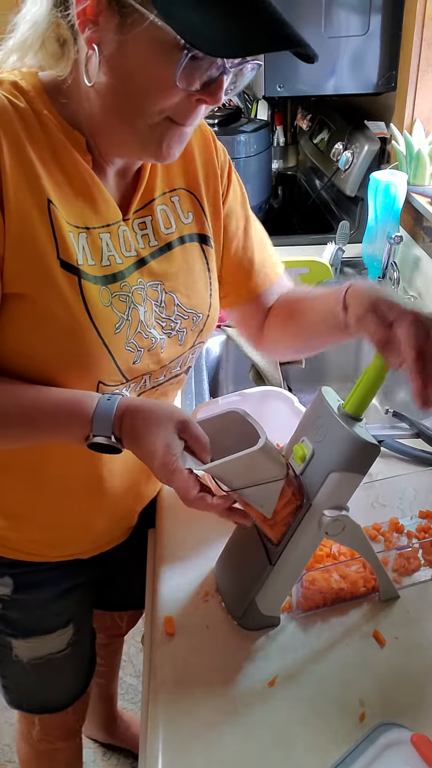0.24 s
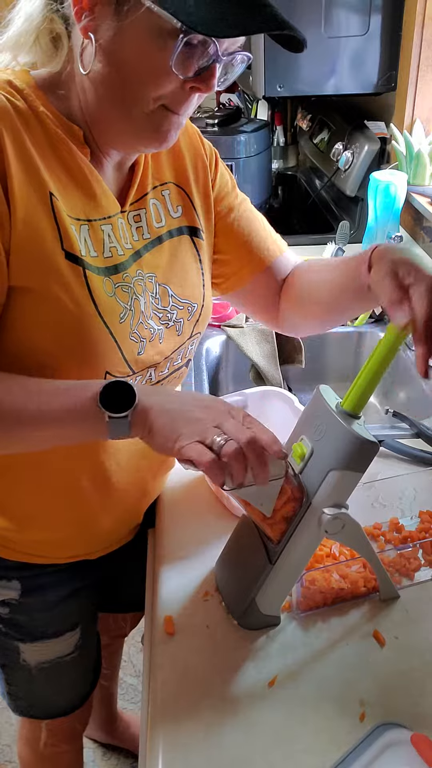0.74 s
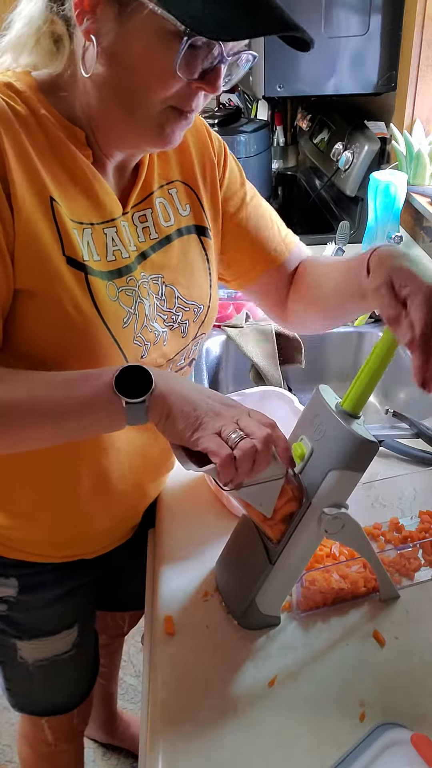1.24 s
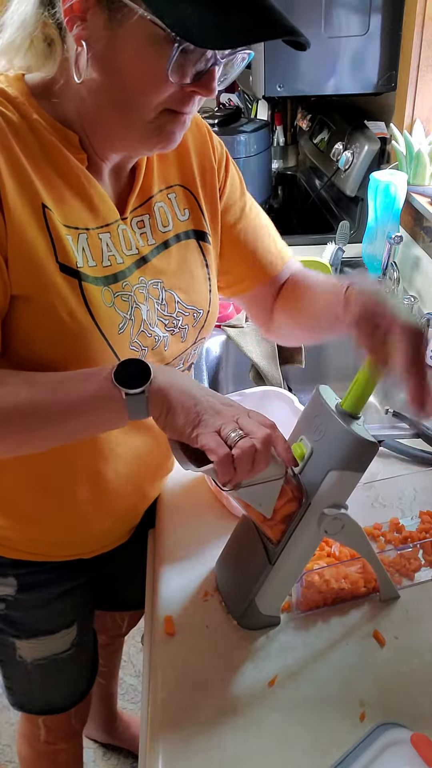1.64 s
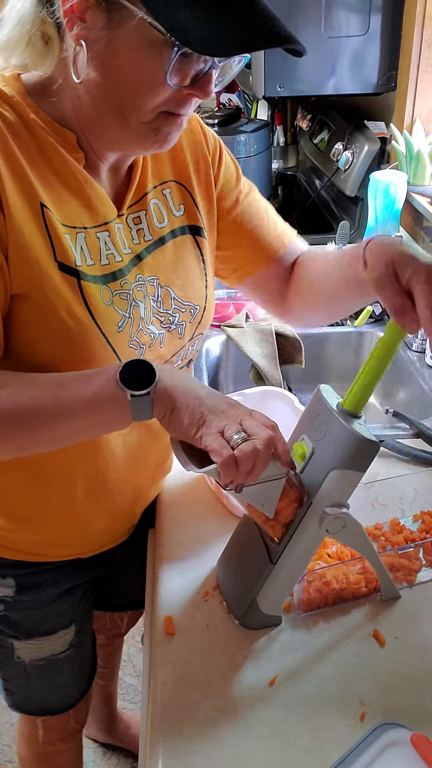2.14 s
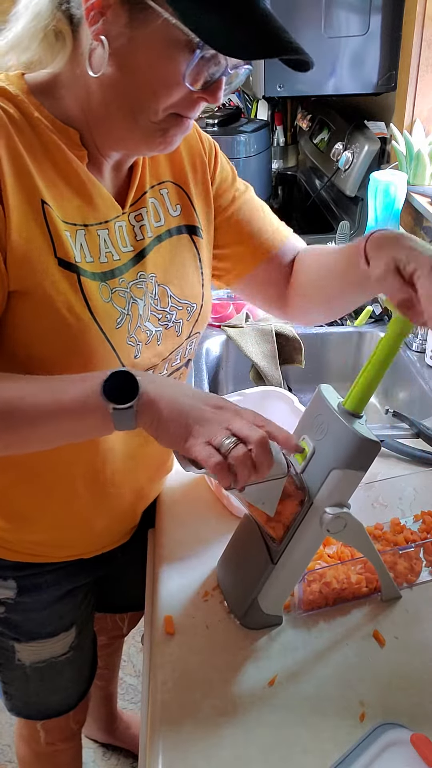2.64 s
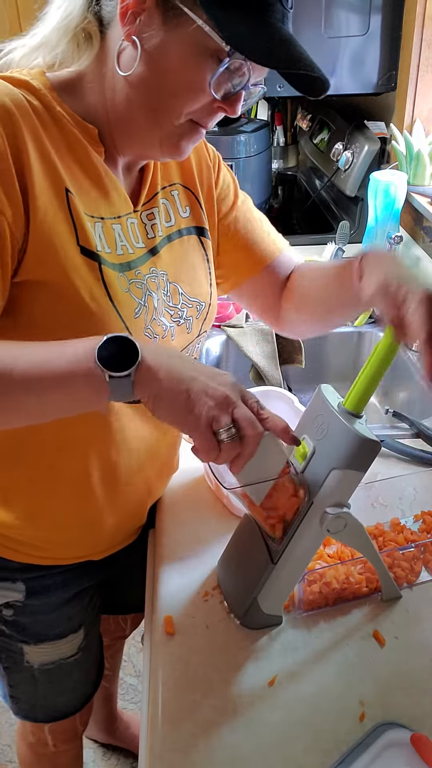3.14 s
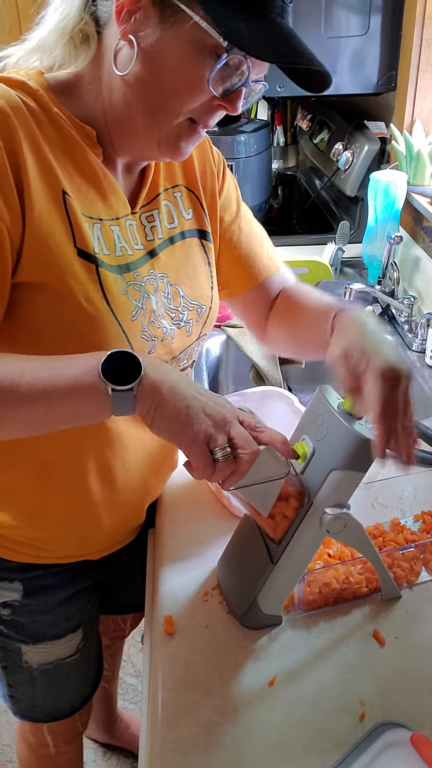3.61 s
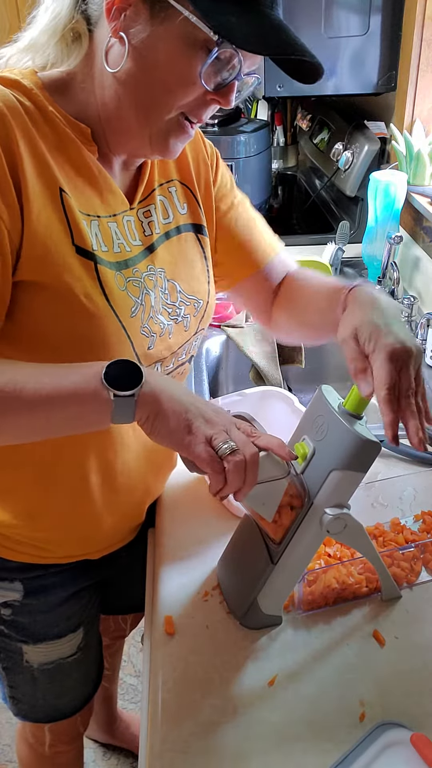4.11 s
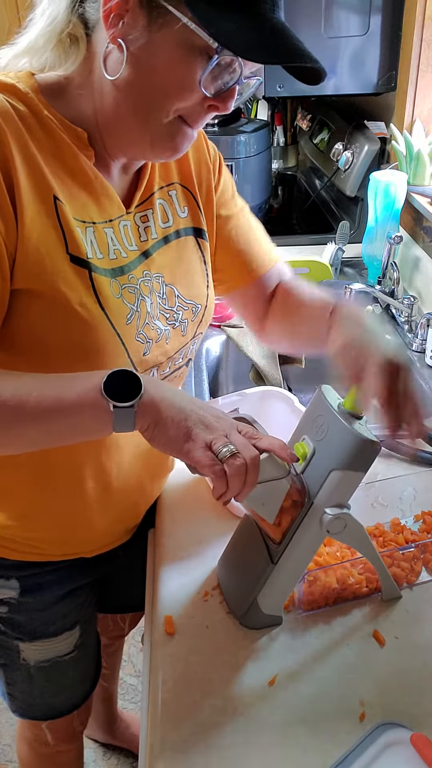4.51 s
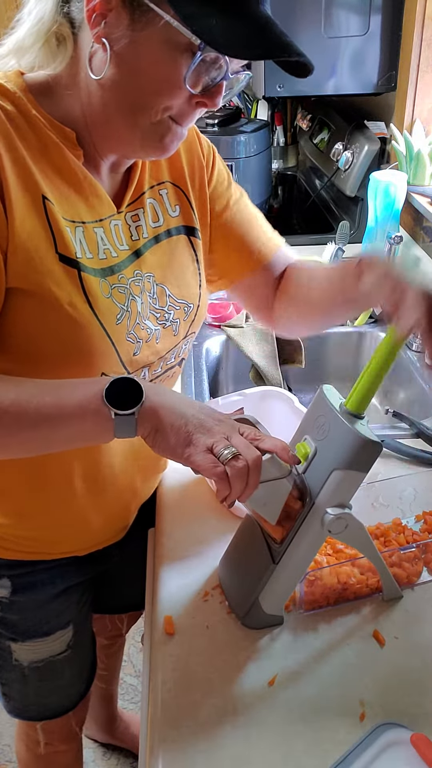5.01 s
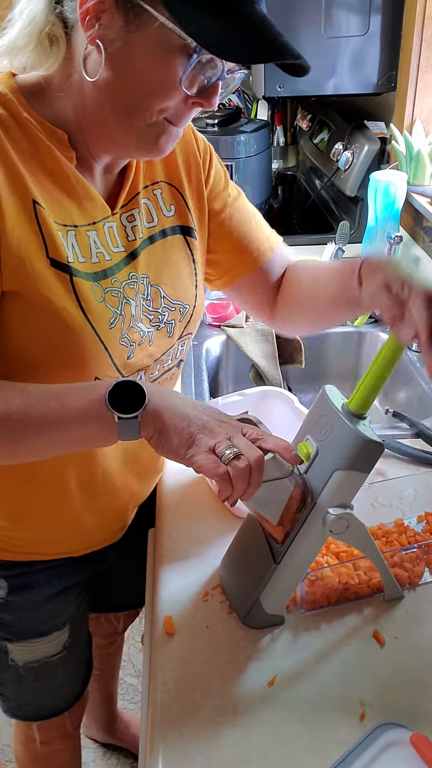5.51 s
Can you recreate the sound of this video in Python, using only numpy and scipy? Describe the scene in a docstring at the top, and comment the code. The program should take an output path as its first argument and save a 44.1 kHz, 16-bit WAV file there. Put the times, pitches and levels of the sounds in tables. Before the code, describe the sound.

A plastic push-handle slicer chops carrots close to the microphone in a small, quiet kitchen with a short echo. Each push gives a brief, grainy rasp of blade through carrot, and each spring return ends in a sharp, hollow plastic clack with a slight rattle. The first clacks come at about 0.1 and 0.7 seconds, followed by a few soft, thumping bites into firm carrot. The handle hits bottom with a dull knock and a low thud through the counter at about 1.4, 1.9, 3.5, 4.4, 4.8 and 5.2 seconds. Return clacks fall around 1.7, 2.1, 2.6, 3.2, 3.7, 4.6, 5.0 and 5.5 seconds, so the last strokes form a quicker thud-and-clack pattern. Throughout, carrot pieces tick and knock lightly in the hollow feed chute, and the sliding parts rub softly. One more faint rasp follows near 5.7 seconds.

```python
"""Sharp plastic clacks, hollow thuds and short rasps: a push-handle slicer chops carrots close by.
Each push rasps the blade through the carrot and may thud on the bottom stop; a spring slides the
carriage back up until it clacks on the top stop. Pieces knock in the feed chute. Blows on the
stops shake the counter and the catch tray, and a small kitchen reverberates."""
import sys
import numpy as np
from scipy import signal
from scipy.fft import rfft, irfft, next_fast_len
from scipy.io import wavfile
from scipy.ndimage import uniform_filter1d, map_coordinates

SR = 44100
rng = np.random.default_rng(int(sys.argv[2]) if len(sys.argv) > 2 else 0)


def generate_wav(signal):
    """Clip the signal to [-1, 1] and save it as 16-bit WAV at the path in sys.argv[1]."""
    frames = np.transpose(np.atleast_2d(signal))
    scaled = np.clip(frames, -1, 1) * 32767
    pcm = np.round(scaled).astype(np.int16)
    wavfile.write(sys.argv[1], SR, pcm)


N = 254016
AGE_S = np.arange(SR // 3) / SR  # time since a blow
BASS_WET_DB = -14

# Table levels are relative; each layer adds its own offset.
# carriage hits the top stop: (time [s], clack [dB], panel ring [dB], panel pitch [Hz],
# chute walls [dB], treble [dB], thump [dB], rubbing on the way up [dB])
RETURNS = [(0.1183, -5, -4, 728, -7, -11.5, -18, -35.5), (0.7301, -13.5, -5, 956, -6, -13, -23.5, -48),
           (1.6764, -4.5, -7.5, 640, -25.5, -12, -25, -40),
           (2.1358, -1.5, -1.5, 655, -16.5, -17, -19.5, -40.5),
           (2.614, -2.5, -9, 534, -17.5, -16, -26, -44), (3.1704, -5, -17, 694, -12.5, -16.5, -22.5, -46.5),
           (3.7321, -5, -4, 1145, -6, -13, -19, -38.5), (4.6064, -4.5, 1, 671, -28, -14, -18, -37.5),
           (5.029, -5, -4.5, 657, -16, -15.5, -19.5, -40.5), (5.4693, -8.5, 4.5, 658, -9.5, -15, -19, -40)]
# handle hits the bottom stop: (time [s], clack [dB], treble [dB], thump [dB])
PUSHES = [(1.3908, -6, -20, -14.5), (1.878, -6.5, -21, -17.5), (3.4737, -11, -25.5, -17.5),
          (4.3665, -7, -20.5, -15.5), (4.7894, -6.5, -20.5, -16), (5.2398, -8.5, -22, -17)]
# blade bites firm carrot: (time [s], thump [dB])
BITES = [(0.871, -32.5), (1.197, -33), (1.323, -21), (1.828, -25), (3.401, -25.5)]
# feed chute wall spectrum: (frequency [Hz], level [dB])
CHUTE_WALLS = [(500, -28), (1000, -16), (1240, -1), (1400, -12.5), (1560, 3), (1750, -10.5), (2100, -18),
               (3500, -31.5), (16000, -54.5)]
# left-right correlation: (frequency [Hz], correlation [-1..1])
CORRELATION = [(60, 0.97), (130, 1), (290, 0.74), (640, 0.7), (1400, 0), (3000, 0.12), (15000, 0)]


def amp(db):
    """Decibels to gain."""
    return 10 ** (np.asarray(db) / 20)


def pan(right_db):
    """Stereo gains for a right-minus-left level."""
    return amp(right_db * np.array([[-.5], [.5]]))


def unit(x):
    """Scale to rms 1."""
    return x / np.sqrt(np.mean(x ** 2) + 1e-20)


def along(points, hz):
    """Read (frequency [Hz], value) points on a log axis."""
    knots_hz, values = np.transpose(points)
    return np.interp(np.log(hz + 1), np.log(knots_hz + 1), values)


def fade(t, t60_s):
    """Free decay, 60 dB in t60_s."""
    return np.exp(-np.log(1000) * t / t60_s)


def wobble(knots_per_s):
    """Smooth random curve."""
    return map_coordinates(rng.standard_normal(N // 8), [np.arange(N) * knots_per_s / SR], mode="wrap")


def filtered(x, response):
    """Zero-phase filter with gain response(hz)."""
    size = x.shape[-1]
    padded = next_fast_len(size + 8192)
    return irfft(rfft(x, padded) * response(np.fft.rfftfreq(padded, 1 / SR)), padded)[..., :size]


def stereo_angle(hz):
    """Mid-side angle [rad] for the left-right correlation."""
    return np.arccos(np.clip(along(CORRELATION, hz), -1, 1)) / 2


def noise(spectrum, size=N):
    """Coloured stereo noise, rms 1: bass alike in both ears, treble unrelated."""
    colour = lambda hz: amp(along(spectrum, hz)) * [np.cos(stereo_angle(hz)), np.sin(stereo_angle(hz))]
    mid, side = filtered(rng.standard_normal((2, size)), colour)
    return unit(np.array([mid + side, mid - side]))


def add(track, at_s, sound):
    """Mix a sound into the track."""
    start = max(round(at_s * SR), 0)
    part = sound[:, :N - start]
    track[:, start:start + part.shape[1]] += part


def ring(modes, attack_s, scatter_db):
    """Struck modes (frequency [Hz], level [dB], t60 [s]); strength and phase vary per blow."""
    hz, db, t60_s = np.transpose(modes)[:, :, None]
    strength, phase, skew = rng.standard_normal((3, len(modes), 1))
    apart = np.sign(skew) * stereo_angle(hz)
    envelope = amp(db + scatter_db * strength) * fade(AGE_S, t60_s) * (1 - np.exp(-AGE_S / attack_s))
    angle = 2 * np.pi * (hz * AGE_S + phase)
    return np.array([np.sum(envelope * np.sin(angle + ear * apart), 0) for ear in (1, -1)])


def note(hz, t60_s):
    """One dominant resonance."""
    return ring([(hz, 0, t60_s)], attack_s=.0015, scatter_db=0)


def chatter(spectrum, treble_db, spread_s, t60_s, count):
    """Loose plastic parts meet in a few dry cracks."""
    jitter = rng.uniform(0, 0.34, count) * (np.arange(count) > 0)
    delays_s = spread_s * (np.arange(count) + jitter) / count
    age_s = AGE_S - delays_s[:, None]
    power = np.sum((age_s > 0) * fade(np.abs(age_s), t60_s) ** 2, 0)
    envelope = np.sqrt(np.abs(uniform_filter1d(power, size=40)))
    shelf = lambda hz: amp(treble_db * along([(1500, 0.048), (6000, 1)], hz))
    return filtered(noise(spectrum, size=len(AGE_S)), shelf) * envelope


def air():
    """Faint, low room noise."""
    # (frequency [Hz], level [dB])
    spectrum = [(30, -9.5), (90, -7), (180, -16), (900, -26), (2500, -51.5), (16000, -73)]
    return amp(-54) * noise(spectrum)


def in_kitchen(x, wet_db):
    """Direct sound plus a room tail; each frequency dies at its own rate."""
    # reverberation time: (frequency [Hz], t60 [s])
    decay = [(70, 0.31), (250, 0.64), (700, 0.3261), (2500, 0.42), (7000, 0.18), (15000, 0.61)]
    # tail colour: (frequency [Hz], level [dB])
    colour = [(60, -1), (130, -3), (280, 3), (700, 2), (2500, -5.5), (7000, 0.5), (15000, -16.5)]
    white = noise([(20, 0), (20000, 0)], size=SR // 2)
    hz, t, bins = signal.stft(white, SR, nperseg=256)
    tail = signal.istft(bins * fade(t, along(decay, hz)[:, None]), SR, nperseg=256)[1]
    build_up = 1 - np.exp(-(np.arange(tail.shape[1]) / SR / 0.0054) ** 2)
    tail = filtered(tail / np.linalg.norm(tail[0]), lambda f: amp(along(colour, f))) * build_up
    wet = amp(wet_db) * signal.fftconvolve(x, tail, axes=1)
    return wet + np.pad(x, ((0, 0), (0, wet.shape[1] - x.shape[1])))


def thump(contact_s):
    """A blow drives the counter's low modes (longer contact is duller); room bass hangs on."""
    # slicer on the counter: (frequency [Hz], level [dB], t60 [s])
    counter_modes = [(63.5, -9, 0.13), (87.9, -0.5, 0.15), (170.7, -2, 0.044), (261, -17.5, 0.13)]
    # kitchen standing waves: (frequency [Hz], level [dB], t60 [s])
    room_modes = [(54.4, 4, 0.76), (77.8, -6, 0.76)]
    response = sum(-(-1) ** k * amp(db) * fade(AGE_S, t60_s) * np.sin(2 * np.pi * hz * AGE_S)
                   for k, (hz, db, t60_s) in enumerate(counter_modes))
    force = np.sin(np.pi * np.minimum(AGE_S / contact_s, 1)) ** 2
    shake = signal.fftconvolve(response, force / force.sum())[:len(AGE_S)]
    # upper modes radiate from the right
    placement = lambda hz: pan(along([(80, 1.3), (150, 6.5), (300, 2.4)], hz))
    room_bass = amp(-22) * ring(room_modes, attack_s=0.055, scatter_db=4)
    return filtered(shake, placement) + room_bass


def stand(rubbing):
    """Stand and counter rumble behind the carriage's motion and jolt where the blade bites."""
    # rumble: (frequency [Hz], level [dB])
    spectrum = [(25, -38), (38, -12), (48, -7), (62, -6.5), (82, -0.5), (105, -12.5), (135, -14.5),
                (400, -60)]
    rest_db, rock_db, lag_s = -52, -1.5, 0.018
    pole = np.exp(-1 / (lag_s * SR))
    rocking = signal.lfilter([1 - pole], [1, -pole], rubbing)
    out = (amp(rest_db) + amp(rock_db) * rocking) * noise(spectrum)
    for at_s, db in BITES:
        add(out, at_s, amp(db + 11) * thump(contact_s=0.0082))
    return out


def swell(peak_s, rise_s, t60_s):
    """A movement eases in to its peak, then dies away."""
    t = np.arange(N) / SR - peak_s
    ahead = np.clip(-3.06 * t / rise_s, 0, 20)
    return fade(np.maximum(t, 0), t60_s) / np.cosh(ahead)


def travel():
    """Rubbing and rasp envelopes: all carriage movements, summed in power."""
    # hand cuts or nudges the carrot: (peak time [s], rise [s], rubbing [dB], rasp offset [dB])
    strokes = [(0.245, 0.082, -43, -0.5), (0.34, .08, -54.5, -4.5), (0.52, 0.17, -43, -12.5),
               (0.878, 0.06, -40.5, -5.5), (1.219, 0.087, -44, -13.5), (1.387, 0.084, -28, -4.5),
               (1.87, 0.2, -33, -6), (2.352, .095, -32, -7), (2.896, 0.15, -36, -12),
               (3.336, 0.061, -39.5, -11.5), (3.462, 0.12, -33, -7), (3.6, .06, -51, -7.5),
               (3.94, 0.097, -34.5, -8), (4.218, 0.088, -41.5, -10.5), (4.363, 0.068, -27.5, -7.5),
               (4.785, 0.15, -30.5, -9), (5.23, 0.19, -31.5, -8), (5.657, 0.15, -35, -5.5)]
    spring_s, spring_attack_s = 0.092, 0.014
    spring_rasp_db, shiver_rasp_db, bite_rasp_db = -8, -16.5, -3
    moves = [(amp(db) * swell(at_s, rise_s, t60_s=0.17), rasp_db)
             for at_s, rise_s, db, rasp_db in strokes]
    t = np.arange(N) / SR
    for at_s, *_, db in RETURNS:
        speed = .5 * (1 + np.tanh((t - at_s + spring_s) / (2 * spring_attack_s))) * (t < at_s)
        moves.append((amp(db) * speed, spring_rasp_db))
    for at_s, db, *_ in RETURNS + PUSHES:
        shiver = amp(db - 23.5) * swell(at_s + 0.012, rise_s=0.026, t60_s=0.33)
        moves.append((shiver, shiver_rasp_db))
    for at_s, db in BITES:
        crunch = amp(db - 14) * swell(at_s + 0.0056, rise_s=0.0056, t60_s=0.13)
        moves.append((crunch, bite_rasp_db))
    rubbing = np.sqrt(sum(move ** 2 for move, _ in moves))
    rasping = np.sqrt(sum((amp(rasp_db) * move) ** 2 for move, rasp_db in moves))
    return rubbing, rasping


def sliding(rubbing, rasping):
    """The carriage rubs its rails while the blade bursts carrot cells in uneven grains."""
    # rail friction: (frequency [Hz], level [dB])
    rub_spectrum = [(80, -7.5), (200, 1.5), (400, -5.5), (580, -3), (680, 5), (800, 0), (1300, -3.5),
                    (2400, -8), (4000, -12.5), (7000, -21.5), (16000, -46)]
    # blade in carrot: (frequency [Hz], level [dB])
    rasp_spectrum = [(500, -39), (2000, 6.5), (4000, -2.5), (7000, -6), (9000, -3), (12500, -5),
                     (16000, -8)]
    slips = wobble(knots_per_s=130)
    grains = wobble(knots_per_s=1700)
    rub = amp(-0.5) * rubbing * unit(amp(2 * slips + 0.52 * grains) * noise(rub_spectrum))
    rasp = amp(4.5) * rasping * unit(amp(2.2 * slips + 1.7 * grains) * noise(rasp_spectrum))
    return in_kitchen(rub + rasp, wet_db=-11)[:, :N] * pan(right_db=1.4)


def crumbs(rubbing):
    """Knock rows for loose dice tumbling at random, harder while the carriage moves."""
    rate_per_s, rest_db, moving_db, scatter_db = 22, -55.5, 1, 7
    ring_db, centre_hz, span_octaves, treble_db = -3.5, 775, .6, -23
    rows = []
    for when, size, pitch in rng.uniform(size=(round(rate_per_s * N / SR), 3)):
        at = int(when * N)
        db = 20 * np.log10(amp(rest_db) + amp(moving_db) * rubbing[at]) + scatter_db * (2 * size - 1)
        ring_hz = centre_hz * 2 ** (span_octaves * (pitch - .5))
        rows.append((at / SR, db, ring_db, ring_hz, treble_db))
    return rows


def chute(rubbing):
    """Carrot pieces and the pusher knock in the hollow feed chute; its note shifts with the load."""
    # (time [s], knock [dB], ring [dB], ring pitch [Hz], treble [dB])
    knocks = [(0.0044, -18.5, -1.5, 930, -22.5), (0.364, -26.5, -7.5, 954, -11),
              (0.379, -18.5, -13.5, 696, -11.5), (0.4304, -34, 11, 690, -38), (0.6828, -26, -6.5, 692, -16),
              (1.1558, -35, -3.5, 640, -24), (1.1988, -29, 0, 905, -18.5), (1.3147, -22.5, -10.5, 710, -16),
              (1.5744, -23.5, 2.5, 673, -28), (1.9624, -25.5, -13, 702, -3.5),
              (2.3984, -25.5, -2, 684, -15), (2.945, -34.5, 4, 704, -22), (3.296, -23, -6, 897, -24.5),
              (4.3131, -25, 3.5, 690, -19), (4.9114, -24, 1.5, 670, -15), (5.1564, -19, 1.5, 679, -28),
              (5.1746, -3.5, -4, 696, -25)]
    # contact tick: (frequency [Hz], level [dB])
    spectrum = [(100, 1), (400, -2.5), (700, -4), (1500, -1), (2400, 0), (3500, -3), (7000, -19),
                (12000, -27.5), (16000, -30)]
    out = np.zeros((2, N))
    for at_s, db, ring_db, ring_hz, treble_db in knocks + crumbs(rubbing):
        tick = amp(db - 10.5) * chatter(spectrum, treble_db + 9, spread_s=.004, t60_s=0.039, count=2)
        walls_db = db - 0.5 * treble_db - 26  # dull knocks move the walls more
        walls = amp(walls_db) * chatter(CHUTE_WALLS, 0, spread_s=0.012, t60_s=0.092, count=2)
        hollow = amp(db + ring_db - 4) * note(ring_hz, t60_s=0.079)
        add(out, at_s, tick + walls + hollow)
    return in_kitchen(out, wet_db=-7)[:, :N]


def tray(attack_s, t60_s):
    """Hollow stand and catch tray boom; the shifting carrot heap retunes them at every blow."""
    # (frequency [Hz], level [dB])
    modes = [(168, 6), (228, 14), (258, -4), (288, -2), (318, 6), (348, -4.5), (385, -1.5), (437, -10.5),
             (512, -6.5)]
    hz, db = np.transpose(modes)
    load = 1 + .025 * rng.standard_normal(len(hz))
    return ring(np.column_stack([hz * load, db, np.full(len(hz), t60_s)]), attack_s, scatter_db=2.5)


def housing(attack_s):
    """The plastic shell rings: higher modes die sooner, all shift slightly with the grip."""
    # (frequency [Hz], level [dB])
    modes = [(525, -18), (660, -5), (810, -1.5), (938, -2), (1200, -0.5), (1670, 1.5), (2000, 2.5),
             (2300, 2), (2480, -14.5), (2840, 1), (3740, -12.5), (4240, -5), (5020, -8), (6375, -4)]
    hz, db = np.transpose(modes)
    grip = 1 + .008 * rng.standard_normal(len(hz))
    t60_s = .09 * np.sqrt(660 / hz)
    return ring(np.column_stack([hz * grip, db, t60_s]), attack_s, scatter_db=4.5)


def bottom_stop():
    """The hand drives the handle home: a dull knock and a hard thud that sets the tray booming."""
    # impact: (frequency [Hz], level [dB])
    spectrum = [(100, -5), (300, 1), (700, -0.5), (1400, -2), (2300, -1), (3300, -7), (7000, -15),
                (12000, -17), (16000, -33)]
    out = np.zeros((2, N))
    for at_s, db, treble_db, thump_db in PUSHES:
        crack = amp(db - 8.5) * chatter(spectrum, treble_db + 17, spread_s=0.0095, t60_s=0.037, count=3)
        body = amp(db - 19.5) * housing(attack_s=0.0012)
        panel = amp(db - 8.5) * note(hz=677.6, t60_s=0.067)
        handle = amp(db - 11) * note(hz=2345, t60_s=0.042)
        knock = (crack + body + panel + handle) * pan(right_db=2.5)
        add(out, at_s, in_kitchen(knock, wet_db=-5))
        thud = amp(thump_db + 12.5) * thump(contact_s=0.0025)
        add(out, at_s - .002, in_kitchen(thud, BASS_WET_DB))
        add(out, at_s, amp(thump_db - 13) * tray(attack_s=0.035, t60_s=0.23))
    return out


def top_stop():
    """The spring throws the carriage against its stop: a bright clack, then a settling rattle."""
    # impact: (frequency [Hz], level [dB])
    spectrum = [(100, 2.5), (300, -6), (700, 1), (1400, -2), (2800, 0.5), (4200, -8.5), (7000, -12.5),
                (12000, -14), (16000, -20.5)]
    out = np.zeros((2, N))
    for at_s, db, panel_db, panel_hz, walls_db, treble_db, thump_db, _ in RETURNS:
        crack = amp(db - 12) * chatter(spectrum, treble_db + 18, spread_s=.007, t60_s=0.031, count=4)
        rattle = amp(db - 19) * chatter(spectrum, treble_db + 12, spread_s=0.049, t60_s=0.065, count=6)
        rattle *= fade(AGE_S, t60_s=0.66)
        body = amp(db - 17) * housing(attack_s=0.001)
        walls = amp(db + walls_db - 9) * chatter(CHUTE_WALLS, 0, spread_s=0.0029, t60_s=0.09, count=3)
        # grip and load decide which panel rings most
        panel = amp(db + panel_db - 2.5) * note(panel_hz, t60_s=0.059)
        clack = (crack + rattle + body + walls + panel) * pan(right_db=2)
        add(out, at_s, in_kitchen(clack, wet_db=-7.5))
        # faint hollow lead-in just before each clack
        lead_in = amp(db - 28) * chatter(CHUTE_WALLS, 0, spread_s=0.0034, t60_s=0.025, count=2)
        add(out, at_s - .005, lead_in)
        recoil = amp(thump_db + 16.5) * thump(contact_s=0.0099)
        add(out, at_s + 0.0015, in_kitchen(recoil, BASS_WET_DB))
        add(out, at_s, amp(thump_db - 18) * tray(attack_s=0.0012, t60_s=0.14))  # damped by the hand
    return out


def scene():
    """The slicer over the kitchen's quiet air."""
    rubbing, rasping = travel()
    stops = top_stop() + bottom_stop()
    return stops + chute(rubbing) + sliding(rubbing, rasping) + stand(rubbing) + air()


def record(dry):
    """Deep-bass cut, soft peak limiting, steep low-pass."""
    cutoff_hz = 16000
    lean = filtered(dry, lambda hz: amp(along([(28, -18), (36, -15.5), (44, 0.5)], hz)))
    rounded = lean / (1 + np.abs(lean) ** 6) ** (1 / 6)
    return filtered(rounded, lambda hz: 1 / (1 + (hz / cutoff_hz) ** 160))


dry = scene()
out = record(dry)
generate_wav(out)
```